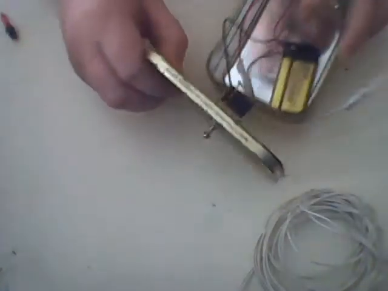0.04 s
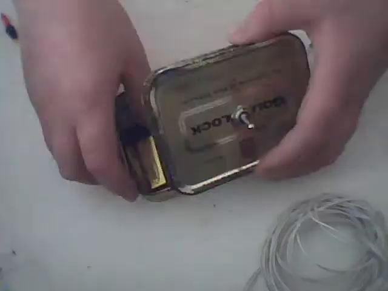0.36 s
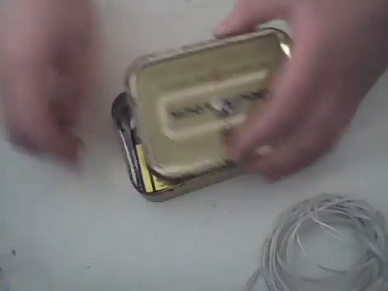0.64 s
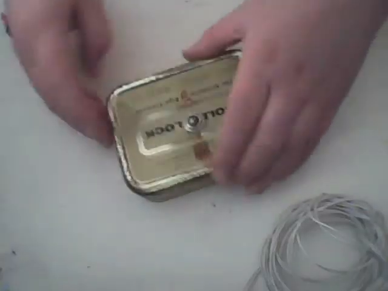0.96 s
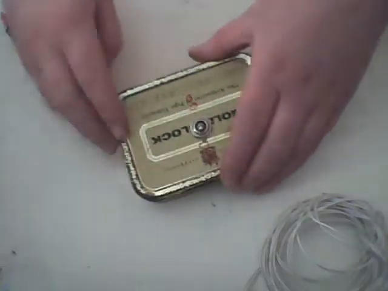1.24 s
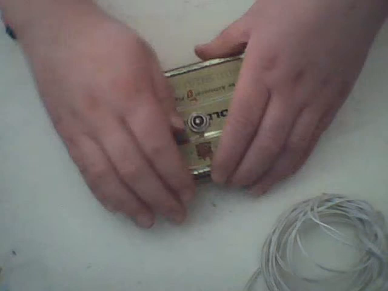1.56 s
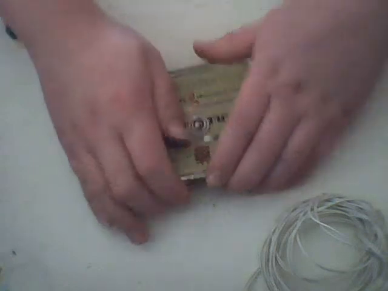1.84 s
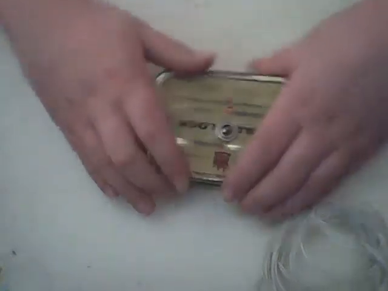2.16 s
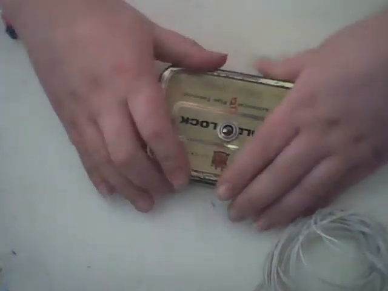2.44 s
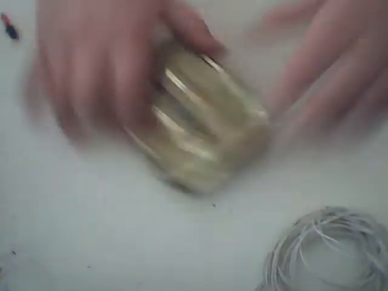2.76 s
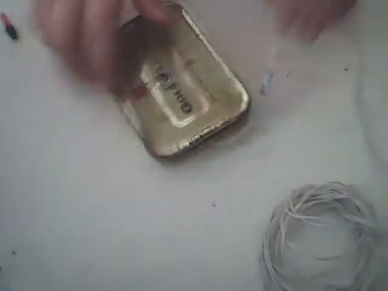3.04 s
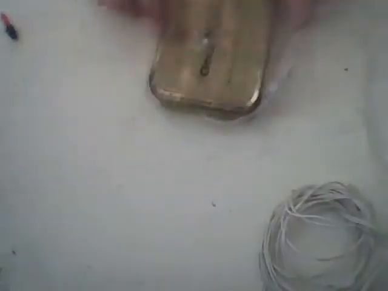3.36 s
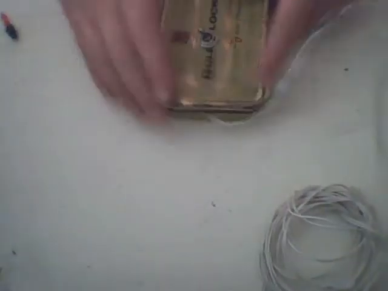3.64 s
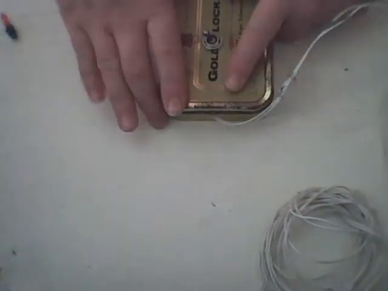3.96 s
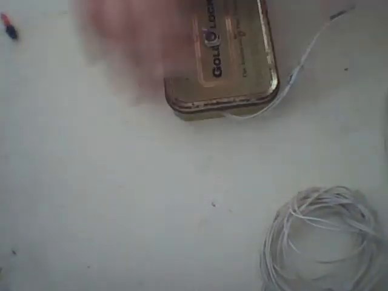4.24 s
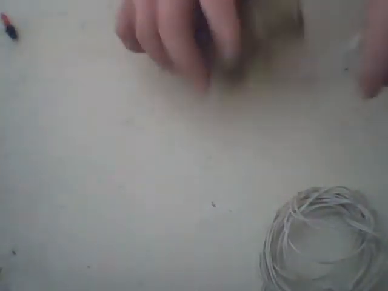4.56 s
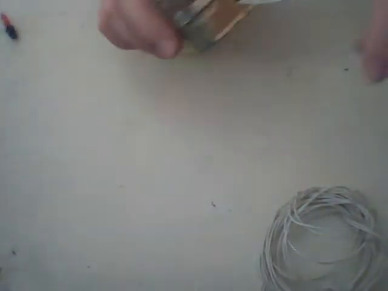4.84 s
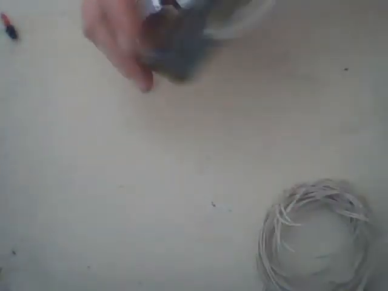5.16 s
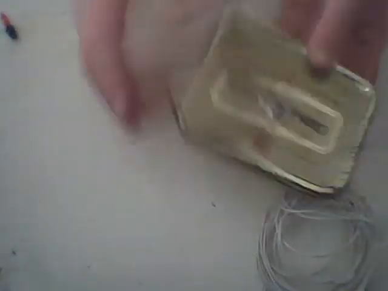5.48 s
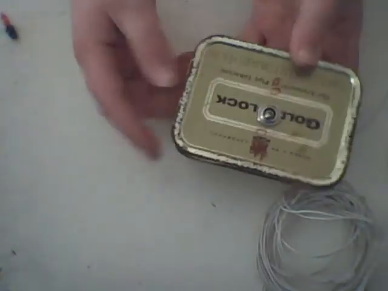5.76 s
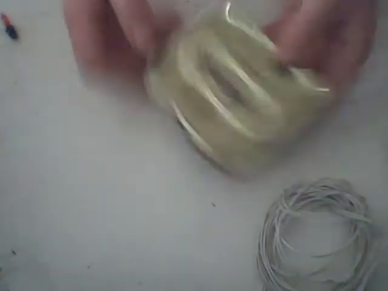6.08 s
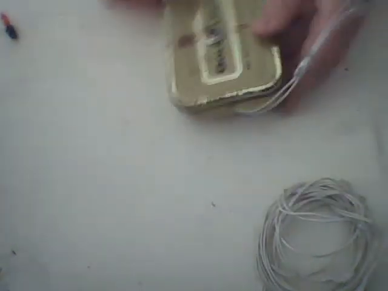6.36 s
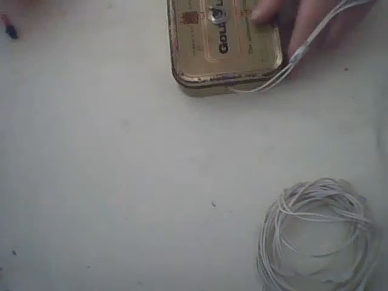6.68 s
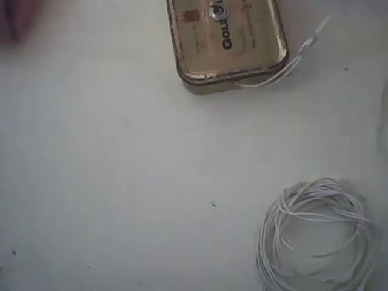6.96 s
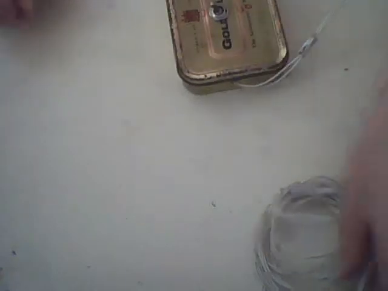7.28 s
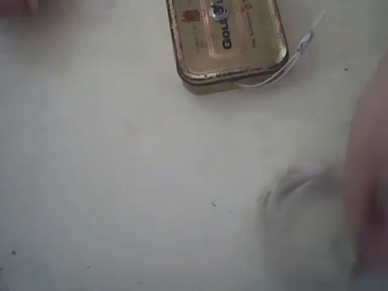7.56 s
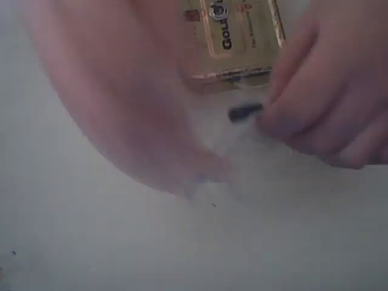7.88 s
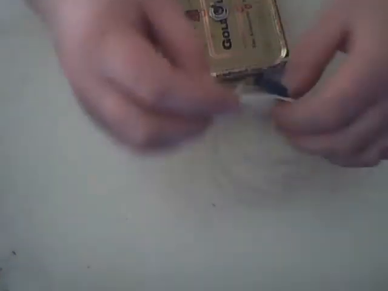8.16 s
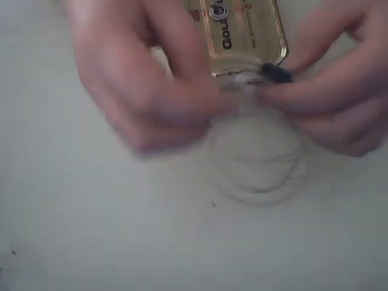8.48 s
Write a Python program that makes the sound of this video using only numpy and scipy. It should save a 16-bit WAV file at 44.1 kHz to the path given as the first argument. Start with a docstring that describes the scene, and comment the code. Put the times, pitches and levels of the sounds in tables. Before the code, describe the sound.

A lid clacks onto a small metal tin at about 0.3 seconds, close to a cheap microphone. Around 0.9 seconds a click is followed by a loud, brief rim squeak and a weaker one. Several knocks press the lid home, strongest at 1.5 seconds; each rings briefly in the metal and thuds in the table. Fingers softly brush the lid near 2 seconds. From 2.6 to 3.4 seconds the tin scrapes and bumps across the table, with another short scrape and knocks around 4.3 to 4.5. After a lull, a small squeak comes at 6.1 seconds, then knocks and a short scrape, and at 6.6 the tin lands hard, overloading the microphone. A wire coil rustles faintly at 7.4 seconds, and tiny dry ticks follow until about 8.7. Hiss, low rumble and a faint drone fill the small, quiet room throughout.

```python
"""A lid clacks onto a small metal tin, close to a cheap microphone at a table in a quiet room.
The rim sticks and slips, squeaking as it is pressed home. The tin is turned round, scraping over the
table top, then lifted and set down with a knock that overloads the microphone. Each blow rings the
sheet metal and thuds in the table. Last, a coil of thin wire is picked up with a rustle and dry ticks.
Behind it all lie hiss, a low rumble and a faint drone."""
import sys
import numpy as np
from scipy import signal
from scipy.fft import rfft, irfft
from scipy.io import wavfile

SR = 44100
rng = np.random.default_rng(int(sys.argv[2]) if len(sys.argv) > 2 else 0)


def dump_mix(stems):
    """Bounce the given channels to the path in sys.argv[1] as a 16-bit WAV at rate SR."""
    frames = np.atleast_2d(stems).T  # one column per channel
    limited = np.clip(frames, -1, 1)  # hard clip at full scale
    pcm = np.round(limited * 32767).astype(np.int16)
    wavfile.write(sys.argv[1], SR, pcm)


N = 384552

# knocks of the tin, close to the microphone; the row at 6.397 s is a quick echo of the knock before it:
# (time [s], thud level [dB], relative tin level [dB], grip [0-1], hardness [dB], chatter [ms])
KNOCKS = [(0.2801, -37, -25, .1, 2, 2.6), (0.2842, -25, -15, 0.09, 6, 8.9),
          (0.343, -38, -25.5, 0.27, -0.5, 4.8), (0.8868, -52, -18, 0.2, 9.5, 3.2),
          (1.072, -35, -28, .6, 6, 2.3), (1.103, -36, -28, 0.5, -4.5, 4.5),
          (1.271, -58.5, -31, 0.7, -9, 1.05), (1.3696, -38, -19.5, 0.56, -3.5, 3.1),
          (1.4895, -25.5, -16.5, 0.8, -3, 2.6), (1.503, -40, -24.5, 0.5, -6, 5),
          (1.515, -19.5, -14.5, 0.89, 4.5, 2.94), (1.929, -42, -45, .05, 14.5, 2.9),
          (1.998, -45, -36.5, 0.1, 4.5, 2.8), (2.679, -41, -27, .45, -6, 3.7),
          (2.75, -50, -29.5, 0.5, -8, 4.8), (2.792, -35.5, -28.5, 0.4, -3, 5.2),
          (2.932, -43, -29.5, 0.47, -9, 2), (3.305, -32, -38.5, .3, 4.5, 4.5),
          (3.356, -47, -26, 0.6, -2.5, 3.2), (3.722, -36.5, -52, .4, 9, 3.1),
          (4.355, -30, -28, 0.42, -11, 3.5), (4.4742, -37, -28.5, 0, -1.5, 0.87),
          (4.485, -32, -23.5, 0.16, -2.5, 3.4), (4.535, -32, -22.5, 0.04, 0.5, 0.56),
          (5.36, -67, -41, 0.8, -6, 8.7), (5.5133, -64, -45, 0.2, 22, 1.7),
          (6.2012, -26, -19.5, 0.11, 2, 2.1), (6.386, -37, -28.5, 0.2, -10, 6.8),
          (6.397, -36.5, -27.5, 0.18, -7, 3.3), (6.6232, -20, -8, 0.13, 7.5, 5.8),
          (6.6296, -24, -13.5, 0.3, 4.5, 1.7)]
# edges of the four bands in which base, lid, walls and rim sound: (frequency [Hz])
PART_EDGES_HZ = [380, 750, 1300, 2200, 7500]
# base, lid, walls and rim of the free tin under a medium contact: (relative level [dB])
PART_BALANCE_DB = [-7, 0, 1, -9.5]

def tin_knocks(free_t60_s=0.043, held_t60_s=0.015, rattle_db=-11, contact_hz=5250):
    """The struck tin rings and loose things rattle inside; grip shortens the ring, hardness wakes the rim."""
    out, t = np.zeros(N), np.arange(8192) / SR
    soften = signal.butter(2, contact_hz, fs=SR, output="sos")
    for start, _, tin_db, grip, hard_db, chatter_ms in KNOCKS:
        t60 = free_t60_s * (held_t60_s / free_t60_s) ** grip
        chatter = burst(np.exp(-t * 1000 / chatter_ms))  # a dying run of small re-contacts
        ring = signal.fftconvolve(chatter, tin_ring(t, t60))[:len(t)]
        rattle = amp(rattle_db) * np.linalg.norm(ring) * burst(np.exp(-t / (0.14 * t60)))
        knock = signal.sosfilt(soften, ring + rattle)
        touch_db = [-0.22 * hard_db, 0, -22.5 * grip, hard_db]  # hardness thins the base, grip mutes walls
        parts_db = tin_db + np.array(PART_BALANCE_DB) + touch_db
        for db, low_hz, high_hz in zip(parts_db, PART_EDGES_HZ, PART_EDGES_HZ[1:]):
            add(out, start, at_level(band(knock, low_hz, high_hz), db))
    return out

# sheet-metal modes of the tin: (frequency [Hz], relative level [dB], ring time [factor])
TIN_MODES = [(516, -11, 2.2), (588, -2, 1.27), (630, -15, 3.7), (667, -1.5, 0.51), (845, 6.5, 0.53),
             (972, 3.5, 0.67), (1076, -7.5, 0.96), (1160, -3, 0.3), (1436, -2.5, 1.1), (1590, 7.5, 0.3),
             (1750, 7.5, 0.54), (1980, -15, 0.34), (2350, -11.5, 0.33), (2400, -14, 0.33),
             (2940, -18.5, 0.33), (3283, -4.5, 0.33), (3260, -22, 0.54), (3960, -4.5, 0.28),
             (4270, -9, 0.27), (5350, -1, 0.35), (5830, 0.5, 0.46)]

def tin_ring(t, t60, detune=.012):
    """One contact gives a click and hand-damped modes, detuned at random as the grip varies."""
    hz, db, hold = np.transpose(TIN_MODES)[:, :, None]
    hz = hz * (1 + detune * rng.standard_normal(hz.shape))
    ring_s = np.clip(t60 * hold, .014, .055)
    modes = amp(db - 60 * t / ring_s) * np.cos(2 * np.pi * hz * t)
    ring = amp(-17) * modes.sum(0)
    ring[0] += 1  # the direct click
    return ring

# modes of the table top under the tin: (frequency [Hz], relative level [dB], t60 [s])
TABLE_MODES = [(54.7, -22.5, 0.45), (129, -15, 0.16), (155, -7, 0.11), (187, 2, 0.075), (274, -7.5, 0.074),
               (377, -10.5, 0.051)]

def table_thuds(rise_s=0.0029):
    """The same knocks sound in the table top, whose neighbouring modes swing in opposite directions."""
    out, t = np.zeros(N), np.arange(SR // 3) / SR
    modes = sum((-1) ** k * amp(db - 60 * t / t60) * np.sin(2 * np.pi * hz * t)
                for k, (hz, db, t60) in enumerate(TABLE_MODES))
    thud = modes * (1 - np.exp(-t / rise_s))
    for start, thud_db, *_ in KNOCKS:
        add(out, start, at_level(thud, thud_db))
    return out

# the rim slips in its seat: (time [s], level [dB], pitch [Hz], rise [ms], relative rasp level [dB])
RIM_SQUEAKS = [(0.9413, -1, 924, 5.5, -23), (1.009, -13, 1000, 4.4, -14), (6.0914, -12.5, 1015, 3.2, -13)]

def rim_squeaks(sag=0.08, overtone_db=-21, rasp_t60_s=0.022):
    """Stick-slip pumps the lid's main mode briefly as the pitch sags; the slips rasp the higher modes."""
    out, t = np.zeros(N), np.arange(4096) / SR
    for start, db, hz, rise_ms, rasp_db in RIM_SQUEAKS:
        age = t * 1000 / rise_ms  # 1 at the peak
        swell = age * np.exp((1 - age ** 4) / 3)
        pitch_hz = hz * (1 + sag * (1 - age) * np.exp(-age / 2))
        phase = 2 * np.pi * np.cumsum(pitch_hz) / SR
        tone = swell * np.sin(phase) + amp(overtone_db) * swell ** 2 * np.sin(2 * phase)
        slips = signal.fftconvolve(burst(swell ** 2), tin_ring(t, rasp_t60_s))[:len(t)]
        rasp = band(slips, 700, 6500, order=1)
        add(out, start, amp(db) * tone + at_level(rasp, db + rasp_db - 0.5))
    return out

# pushes of the tin across the table: (time [s], length [s], relative level [dB])
PUSHES = [(2.625, 0.09, -29.5), (2.735, 0.065, -23.5), (2.86, 0.12, -38.5), (3.025, .045, -29),
          (3.1, 0.048, -29), (3.172, .195, -27.5), (4.272, 0.065, -31.5), (4.385, 0.026, -39.5),
          (6.32, 0.077, -34)]
# body of the scrape, heard close up: (frequency [Hz], relative level [dB])
SCRAPE_SPECTRUM = [(100, -23), (190, -4), (330, -16), (510, 1.5), (750, -3), (880, 5.5), (1020, 8.5),
                   (1330, -14.5), (1750, -14), (2600, -25.5), (4000, -42)]
# bright fizz on top of the scrape: (frequency [Hz], relative level [dB])
FIZZ_SPECTRUM = [(1200, -1.5), (2300, 0.5), (2900, -10), (3450, -4), (3900, -2.5), (4900, 1.5), (5500, 5),
                 (6200, 5.5), (7500, -15)]

def tin_scrapes(scrape_db=-3, fizz_db=-26, wall_db=-35, unevenness_db=2.0):
    """The tin's base catches on the table top under uneven pressure, and one wall sings along."""
    push = strokes(PUSHES, rise_s=0.023, stop_s=0.026, swell_db=0.5)
    pressure = amp(unevenness_db * noise([(3, -10), (15, -2), (50, -19.5), (150, -68)]))
    catches = pressure * grains(per_s=1500, spread_db=2)
    scrape = amp(scrape_db) * coloured(catches, SCRAPE_SPECTRUM)
    wall = amp(wall_db) * unit_rms(band(catches, 3300, 3480, order=1))
    fizz = amp(fizz_db) * coloured(catches, FIZZ_SPECTRUM)
    return push * scrape + push ** 0.59 * (fizz + wall)  # the fizz grows more slowly than the scrape

# fingers brush the lid: (time [s], length [s], relative level [dB])
FINGER_STROKES = [(1.98, .14, -30.5), (3.58, 0.025, -34.5), (3.98, 0.095, -37)]
# skin on sheet metal: (frequency [Hz], relative level [dB])
SKIN_SPECTRUM = [(90, -9), (180, 9), (330, -6.5), (600, 2.5), (1000, 7.5), (1500, -8), (2200, -3),
                 (3200, -18), (4600, -8), (7000, -19)]

def finger_rubs(gain_db=-4):
    """Skin drags softly over the lid in a dense run of tiny catches."""
    drag = strokes(FINGER_STROKES, rise_s=0.019, stop_s=0.088, swell_db=-4)
    return amp(gain_db) * drag * coloured(grains(per_s=4700, spread_db=2), SKIN_SPECTRUM)

def wire_rustle(start_s=7.425, level_db=-31, rise_s=0.0051):
    """The hand meets the coil, and its loops brush against each other in one short rustle."""
    touch = strokes([(start_s, 2 * rise_s, level_db)], rise_s, stop_s=0.012, swell_db=0)
    return touch * unit_rms(band(grains(per_s=3000, spread_db=0), 500, 4200, order=1))

# tiny ticks near the microphone: (time [s], peak level [dB])
DRY_TICKS = [(0.2425, -18), (0.525, -25), (1.3234, -26), (3.9321, -13), (5.6701, -17), (6.189, -21),
             (6.254, -22), (7.567, -25), (7.8446, -19), (8.141, -26), (8.169, -25), (8.3908, -17),
             (8.674, -21.5)]

def dry_ticks(tail_db=-20, tail_s=0.002):
    """Single sharp spikes with hardly any ring."""
    out, t = np.zeros(N), np.arange(SR // 50) / SR
    for start, db in DRY_TICKS:
        spike = amp(tail_db) * rng.standard_normal(len(t)) * np.exp(-t / tail_s)
        spike[0] = 1
        tick = band(spike, 1400, 6300, order=1)
        add(out, start, amp(db) * tick / abs(tick).max())
    return out

# decay of the small room: (frequency [Hz], t60 [s])
ROOM_DECAY = [(100, 0.44), (260, 0.42), (700, 0.46), (1840, 0.4), (3200, 0.39), (4850, 0.41), (8000, 0.47)]
# first echoes to reach the microphone, off the table and things on it: (delay [s], gain [factor])
EARLY_ECHOES = [(.0031, .16), (.0088, .12), (0.0148, .19), (0.024, .06)]

def room_response(wet_db=-10.5, build_s=0.00096, reflections_per_s=5000):
    """A few early echoes and a tail of dense reflections, each band dying at its own speed."""
    taps = rng.choice([-1., 1.], SR // 2) * (rng.random(SR // 2) < reflections_per_s / SR)
    hz, t, bands = signal.stft(taps, SR, nperseg=256)
    decay = amp(-60 * t / curve_at(ROOM_DECAY, hz)[:, None])
    tail = signal.istft(bands * decay, SR, nperseg=256)[1]
    build_up = 1 - np.exp(-(np.arange(len(tail)) / SR / build_s) ** 2)
    colour = [(950, 0), (2200, 1), (3500, 0), (4800, -3), (7000, -7)]
    tail = coloured(tail * build_up, colour)[:SR * 2 // 5]
    tail *= amp(wet_db) / np.linalg.norm(tail)
    for delay, gain in EARLY_ECHOES:
        add(tail, delay, np.array([gain]))
    return tail

def room_reflections(x, count=3, turn_hz=1.3):
    """Three room tails take turns, so the reverberation has no fixed ringing pitch."""
    turn = 2 * np.pi * turn_hz * np.arange(N) / SR
    shares = (1 + np.cos(turn + 2 * np.pi * np.arange(count)[:, None] / count)) / count
    return sum(signal.oaconvolve(x * np.sqrt(share), room_response())[:N] for share in shares)

# noise floor of the quiet room at the microphone: (frequency [Hz], relative level [dB])
HISS_SPECTRUM = [(47, -57.5), (80, -7), (91, -13), (118, -5), (151, -2.5), (192, -3), (335, -7), (418, -2),
                 (495, -6), (607, 0), (731, -3.5), (966, -1.5), (1300, -6.5), (2030, -9.5), (6800, -21),
                 (8840, -100.5), (15000, -120)]

def room_tone(hiss_db=-42.5, creep_db=3, rumble_db=-53):
    """Hiss creeps up towards the end, over a steady low rumble."""
    hiss = amp(hiss_db + creep_db * np.linspace(0, 1, N) ** 3) * noise(HISS_SPECTRUM)
    rumble = noise([(5, -0.5), (15, -8), (28, -6), (60, -6), (100, -9), (300, -37.5), (1000, -95)])
    return hiss + amp(rumble_db) * rumble

def drone(level_db=-52.5, climb_s=(2.2, 6.4), pitches_hz=(32.9, 55.7), wander_hz=3, swell_db=12.5):
    """A faint, wavering low tone climbs in pitch and swells once, as the tin lands."""
    t = np.arange(N) / SR
    hz = np.interp(t, climb_s, pitches_hz) + wander_hz * noise([(3, 1), (8, 1), (40, -100)])
    swell = np.exp(-((t - 6.6) / 0.4) ** 2)
    return amp(level_db + swell_db * swell) * np.sqrt(2) * np.sin(2 * np.pi * np.cumsum(hz) / SR)

def burst(envelope):
    """Noise under an envelope, like many contacts at many spots, with only mild spectral peaks and dips."""
    spectrum = rfft(rng.standard_normal(len(envelope)) * envelope)
    x = irfft(spectrum / np.sqrt(abs(spectrum) + 1e-12), len(envelope))
    limit = 4 * envelope / np.linalg.norm(envelope)
    x = np.clip(x / np.linalg.norm(x), -limit, limit)
    return x / np.linalg.norm(x)

def grains(per_s, spread_db):
    """Tiny catches of one surface on another, a few of them large."""
    size = amp(spread_db * np.minimum(rng.exponential(1, N), 4))
    return size * rng.standard_normal(N) * (rng.random(N) < per_s / SR)

def strokes(rows, rise_s, stop_s, swell_db):
    """Gain curve of hand strokes: each rises, changes by swell_db along its length and dies away."""
    out = np.zeros(N)
    for start, length, db in rows:
        t = np.arange(N) / SR - start
        swell = amp(db + swell_db * (np.clip(t / length, 0, 1) - .5))
        out += swell * np.clip(t / rise_s, 0, 1) * np.exp(-np.maximum(t - length, 0) / stop_s)
    return out

def amp(db):
    """Decibels to gain."""
    return 10 ** (np.asarray(db) / 20)

def unit_rms(x):
    """Scales to rms 1."""
    return x / np.sqrt(np.mean(x ** 2) + 1e-20)

def at_level(x, db):
    """Scales a knock so that its first 20 ms have this rms level."""
    return amp(db) * x / np.sqrt(np.mean(x[:SR // 50] ** 2) + 1e-20)

def curve_at(points, hz):
    """Interpolates a table on a log-frequency axis."""
    points_hz, values = np.transpose(points)
    return np.interp(np.log(hz + 1), np.log(points_hz + 1), values)

def coloured(x, points):
    """Shapes x by (frequency [Hz], relative level [dB]) points, at rms 1."""
    gains = amp(curve_at(points, np.fft.rfftfreq(len(x), 1 / SR)))
    return unit_rms(irfft(rfft(x) * gains, len(x)))

def noise(points):
    """Noise with a spectrum of (frequency [Hz], relative level [dB]) points, at rms 1."""
    return coloured(rng.standard_normal(N), points)

def band(x, low_hz, high_hz, order=3):
    """A causal band-pass."""
    return signal.sosfilt(signal.butter(order, [low_hz, high_hz], "band", fs=SR, output="sos"), x)

def low_pass(x, hz):
    """A steep low-pass without delay."""
    return signal.oaconvolve(x, signal.firwin(255, hz, window=("kaiser", 8), fs=SR)[None], "same")

def add(mix, start_s, sound):
    """Mixes a sound in at its start time."""
    part = mix[round(start_s * SR):][:len(sound)]
    part += sound[:len(part)]

def scene():
    """Tin, table and wire at close range, in mono, with the quiet room behind them."""
    near = tin_knocks() + table_thuds() + rim_squeaks() + tin_scrapes() + finger_rubs() + wire_rustle()
    ticks = dry_ticks()
    reflections = room_reflections(near + amp(-18) * ticks)
    return (near + ticks + reflections + room_tone() + drone())[None]

def record(dry, edge_hz=7200, top_hz=15800, offset=-0.044):
    """A cheap narrow-band microphone that overloads on the hardest knocks and has a small steady offset."""
    overloaded = np.clip(low_pass(dry, edge_hz + 300), -.88, .94)
    narrow = low_pass(overloaded, edge_hz)
    return low_pass(np.clip(narrow + offset, -1, 1), top_hz)

dry = scene()
out = record(dry)
dump_mix(out)
```